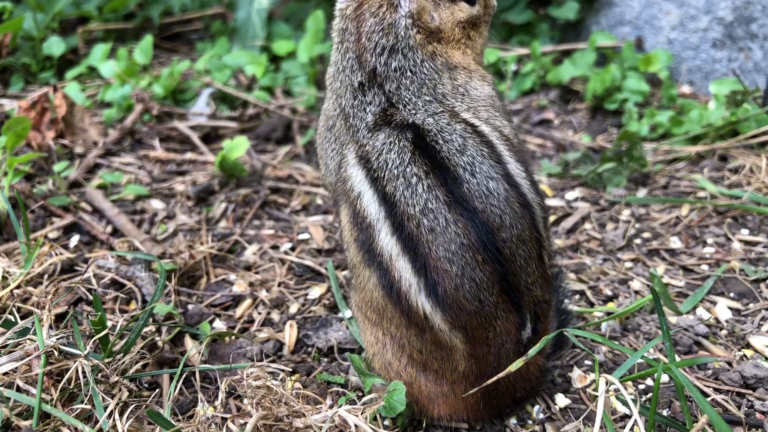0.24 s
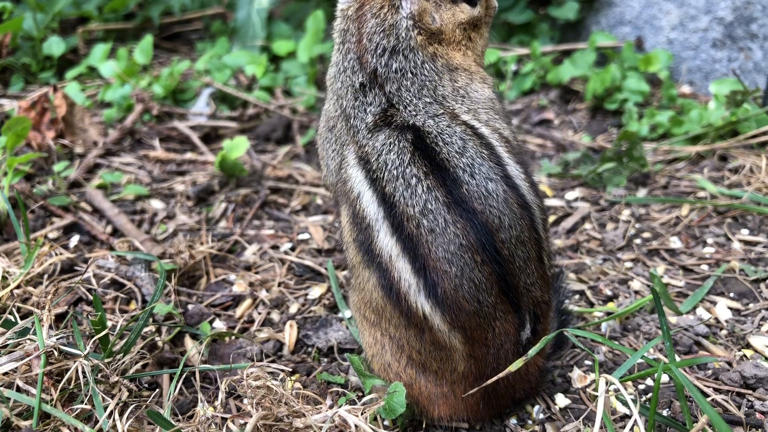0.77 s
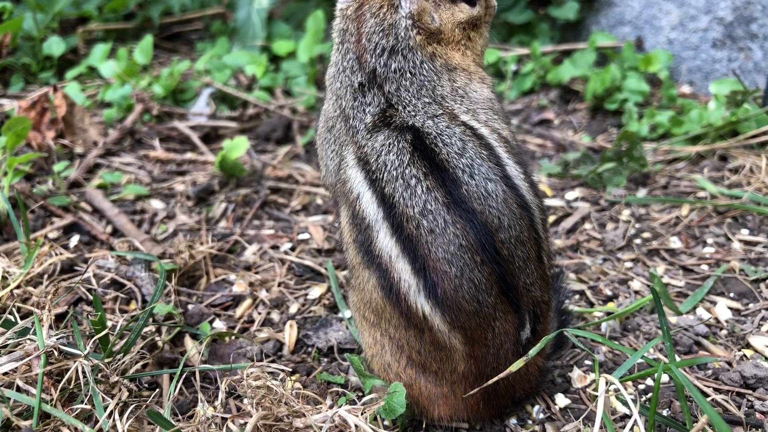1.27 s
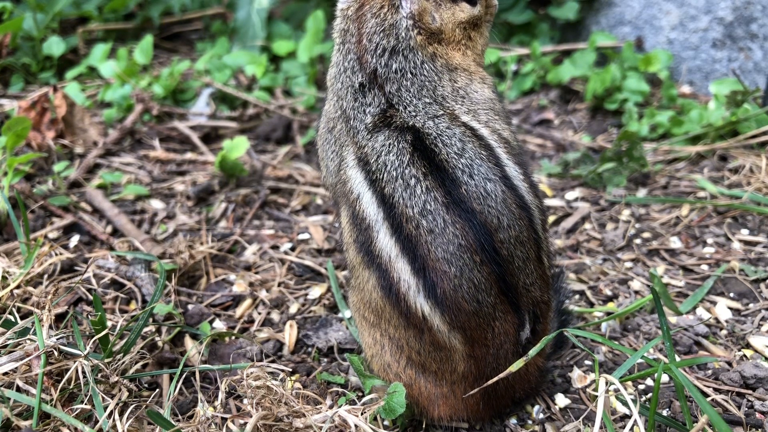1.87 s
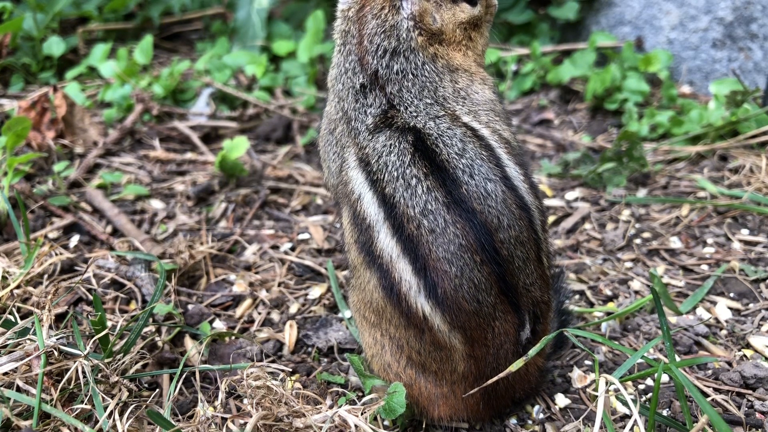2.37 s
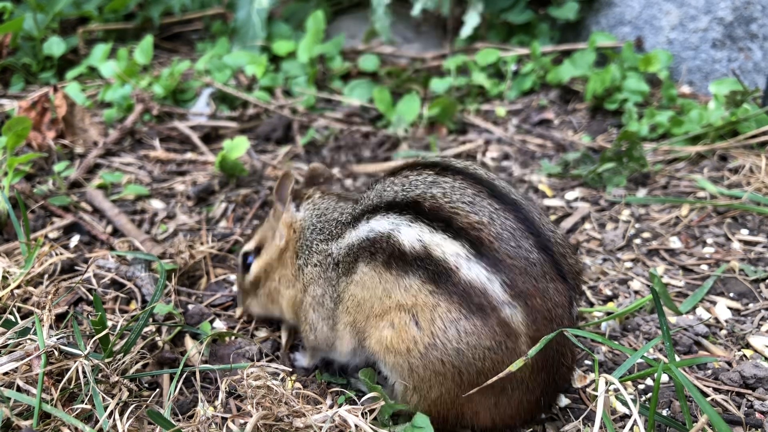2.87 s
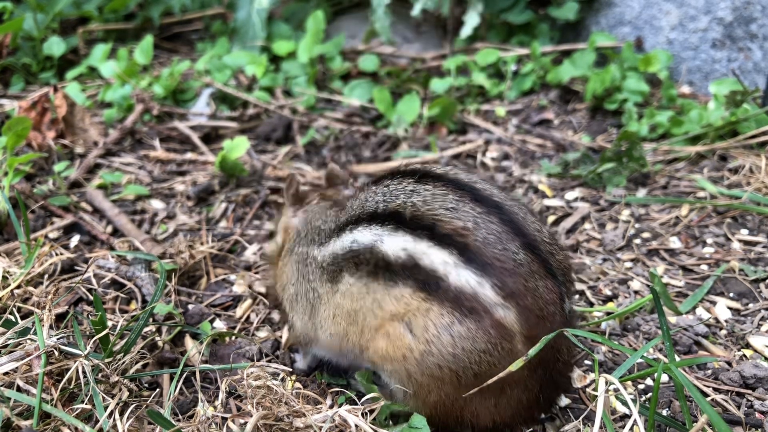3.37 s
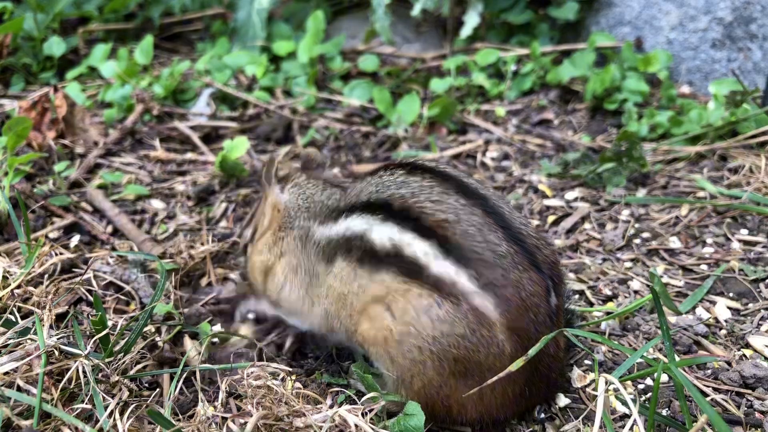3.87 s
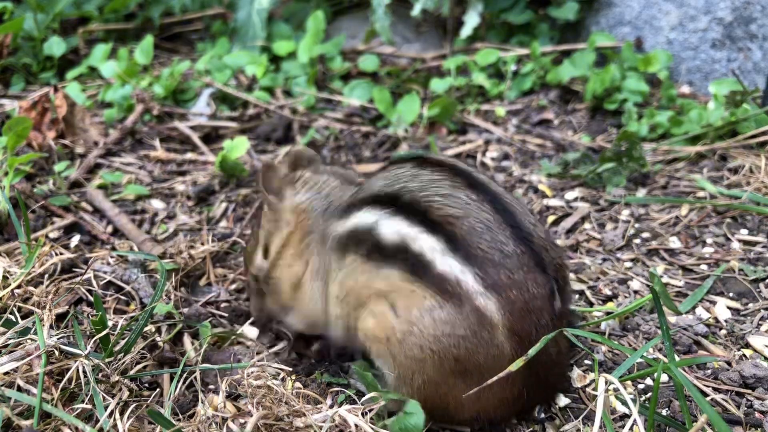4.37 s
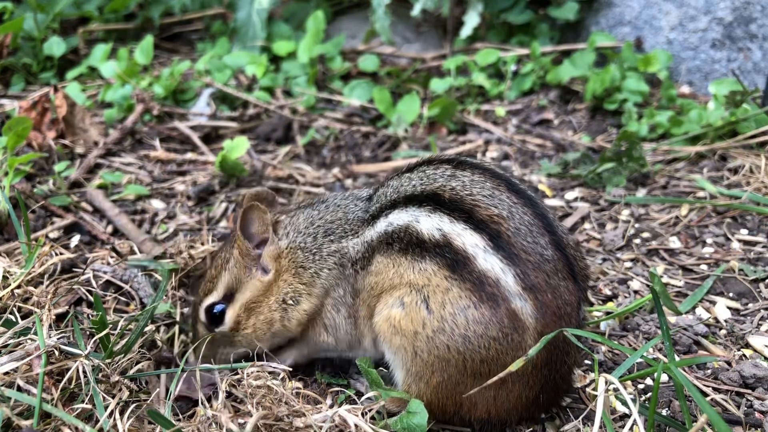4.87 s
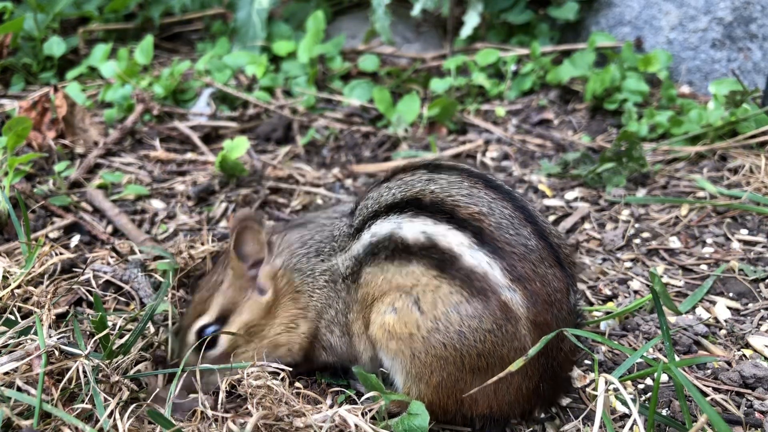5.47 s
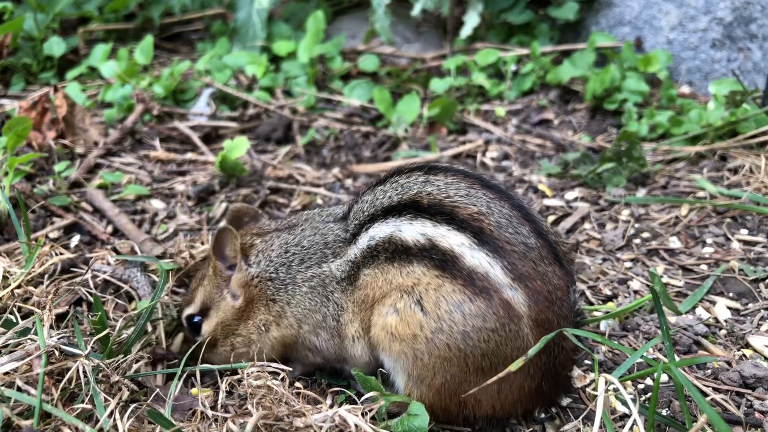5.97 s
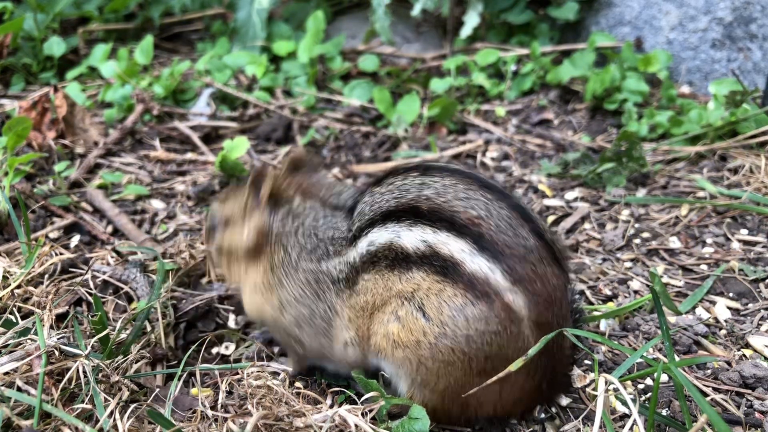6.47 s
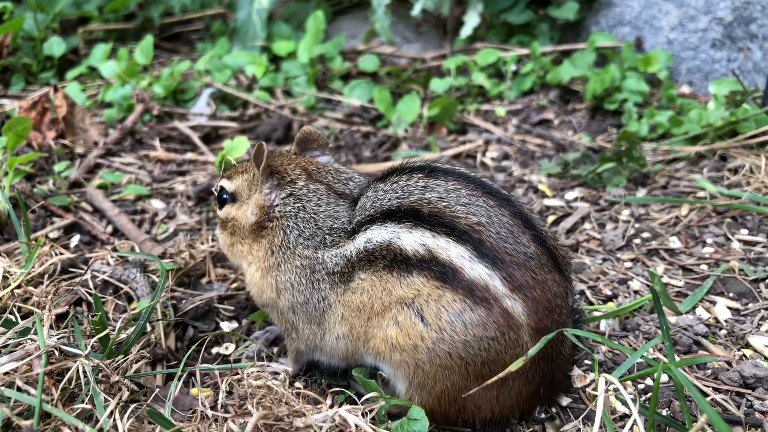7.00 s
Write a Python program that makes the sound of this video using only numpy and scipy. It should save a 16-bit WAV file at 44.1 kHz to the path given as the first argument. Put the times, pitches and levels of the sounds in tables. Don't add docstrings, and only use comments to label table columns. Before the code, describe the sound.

Outdoors in a garden, a chipmunk gives three brief, piercing, rising whistled chips at about 0.6, 2.5 and 5 seconds, each with a rough attack, quick echoes and a short leafy tail. Near the microphone, leaf litter crackles softly and tiny twigs tick, with the strongest snap just before the last chip. Far traffic hum and faint hiss continue beneath; a thin insect rasp pulses later.

```python
import sys
import numpy as np
from scipy import signal
from scipy.fft import rfft, irfft, next_fast_len
from scipy.io import wavfile
from scipy.ndimage import uniform_filter1d, map_coordinates

SR = 44100
rng = np.random.default_rng(int(sys.argv[2]) if len(sys.argv) > 2 else 0)


def natural_amplitude(level_db):
    exponent = np.asarray(level_db, float) / 20
    return 10 ** exponent


def wav_record(signal):
    frames = np.transpose(np.atleast_2d(signal))
    bounded = np.clip(frames, -1, 1)
    quanta = np.round(bounded * 32767).astype(np.int16)
    wavfile.write(sys.argv[1], SR, quanta)


N = 319284


def unit(x):
    return x / np.sqrt(np.mean(x ** 2) + 1e-20)


def along(points, hz):
    f, v = np.transpose(points)
    return np.interp(np.log(hz + 1), np.log(f + 1), v)


def coloured(x, spectrum):
    m = next_fast_len(N + 8192)
    gain = natural_amplitude(along(spectrum, np.fft.rfftfreq(m, 1 / SR)))
    return unit(irfft(rfft(x, m) * gain, m)[:N])


def wobble(rate):
    knots = rng.standard_normal(int(N * rate / SR) + 4)
    return map_coordinates(knots, [np.arange(N) * rate / SR])


def swells(rows):
    t = np.arange(N) / SR
    return sum(gain * np.exp(-.5 * ((t - s) / spread) ** 2) for s, spread, gain in rows)


def air():
    # f/Hz, level/dB
    hum_colour = [(13, -65), (22, -35.5), (32, -24.5), (36, -20), (49, -4.5), (102, -2), (204, -5.5),
                  (262, -9), (292, -7.5), (345, -13), (375, -11.5), (552, -24), (600, -21.5), (780, -54.5),
                  (1320, -120)]
    # f/Hz, level/dB
    hiss_colour = [(260, -31), (450, -1), (553, -3), (595, -5.5), (669, -4), (1390, -11), (1790, -11.5),
                   (2860, -15), (3890, -14.5), (8850, -22), (11000, -26.5), (15000, -26.5)]
    # f/Hz, level/dB
    tyre_colour = [(500, -28.5), (900, 0), (1300, -1), (2000, -3), (2500, -25), (4000, -61)]
    # t/s, level/dB
    road = [(0, 4.5), (1.3, -7), (2.4, -4.5), (3.5, -3.5), (4.1, 2), (6.1, 4), (7.24, 3)]
    hum_db, hiss_db, tyre_db = -63, -71.5, -84.5
    hum_follows, tyres_follow = .05, 1.8
    road_db = np.interp(np.arange(N) / SR, *np.transpose(road))
    hum_level = natural_amplitude(hum_db + hum_follows * road_db + 0.57 * wobble(2.5))
    hum = hum_level * coloured(rng.standard_normal(N), hum_colour)
    hiss = natural_amplitude(hiss_db + .4 * wobble(6)) * coloured(rng.standard_normal(N), hiss_colour)
    tyre_level = natural_amplitude(tyre_db + tyres_follow * road_db + .6 * wobble(2.4))
    tyres = tyre_level * coloured(rng.standard_normal(N), tyre_colour)
    return hum + hiss + tyres


def insect(count=14):
    # f/Hz, level/dB
    wings = [(8000, -48), (8600, -20), (8900, -2), (9300, -18), (9900, -48.5)]
    from_s, every_s, spread_s = 2.775, .342, .04
    start_db, db_per_s, scatter_db = -89.5, -0.1, 2
    since = every_s * np.arange(count)
    gain = natural_amplitude(start_db + db_per_s * since + scatter_db * rng.standard_normal(count))
    rasps = swells([(from_s + s, spread_s, g) for s, g in zip(since, gain)])
    return rasps * coloured(rng.standard_normal(N), wings)


def bird():
    # start t/s, end t/s, first f/Hz, last f/Hz, level/dB
    begin, end, first_hz, last_hz, db = (.453, .51, 7800, 7500, -83)
    u = np.clip((np.arange(N) / SR - begin) / (end - begin), 0, 1)
    pitch = first_hz + (last_hz - first_hz) * u ** 3
    phase = 2 * np.pi * np.cumsum(pitch) / SR
    return natural_amplitude(db + 3 * wobble(91.2)) * np.sqrt(np.abs(np.sin(np.pi * u))) * np.sin(phase)


def stirrings(count=14):
    from_s, faint_db, spread_s = 2.9, -85, .008
    when, size, bright = rng.random((count, 3)).T
    centre = from_s + when * (N / SR - from_s)
    return list(zip(centre, spread_s * (.5 + size), faint_db + 4 * size, .5 + .5 * bright))


def crackle():
    return rng.standard_normal(N) * natural_amplitude(4.5 * wobble(600))


def litter():
    # centre t/s, spread t/s, level/dB, bright share (0-1)
    rustles = [(.9, .018, -74, .85), (1.03, 0.0099, -78, 0.75), (1.152, 0.0073, -76, .8),
               (1.29, .012, -81, .6), (2.65, .03, -73, .15), (3.435, 0.01475, -78, .4),
               (3.6, 0.0114, -80.5, .7), (3.815, .015, -77, .8), (3.85, 0.015, -68.5, .5),
               (3.89, .012, -77, .7), (4.15, 0.0236, -77.5, 0.3), (4.41, 0.0182, -73.5, .63),
               (4.47, 0.0253, -78.5, .7), (4.675, 0.0125, -75.5, 0.98), (4.735, .015, -74, 0.8),
               (4.805, 0.00817, -69.5, 0.78), (4.823, 0.00434, -64, .8), (5.572, 0.0068, -70, .84),
               (5.8, 0.023, -79, .95), (5.885, .018, -77, .6), (6.14, 0.0146, -74.5, .5),
               (7.215, .012, -77, 0.75)]
    # f/Hz, level/dB
    damp_colour = [(600, -23.5), (1500, -1), (3500, -3.5), (7000, -7.5), (12000, -22.5)]
    # f/Hz, level/dB
    dry_colour = [(2500, -32), (6000, -6), (10000, -0.5), (13000, 0), (15000, 5), (16000, 0)]
    bursts = rustles + stirrings()
    dull = swells([(s, w, natural_amplitude(db) * np.sqrt(np.clip(1 - b, 0, 1))) for s, w, db, b in bursts])
    bright = swells([(s, w, natural_amplitude(db) * np.sqrt(np.clip(b, 0, 1))) for s, w, db, b in bursts])
    return dull * coloured(crackle(), damp_colour) + bright * coloured(crackle(), dry_colour)


def twigs():
    # t/s, peak level/dB, f/Hz
    ticks = [(2.636, -66, 11000), (2.655, -63, 9000), (2.685, -62.5, 12000), (3.43, -61, 3300),
             (3.9255, -52, 6970), (4.4927, -63, 12000), (4.929, -42.5, 3300), (4.936, -41, 3400),
             (4.9797, -49.5, 3920), (5.0185, -55, 3500), (5.308, -55, 3800), (5.431, -60.5, 4000),
             (6.875, -69, 13040)]
    snap_cycles = 1.9
    rebound_s, rebound_db = .0014, -14
    splinter_hz, splinter_db, splinter_cycles = 15000, -17, 2.5
    parts = []
    for s, db, hz in ticks:
        parts.append((s, db, hz, snap_cycles))
        parts.append((s + rebound_s, db + rebound_db, hz, snap_cycles))
        parts.append((s, db + splinter_db, splinter_hz, splinter_cycles))
    out, t = np.zeros(N), np.arange(-40, 200) / SR
    for s, db, hz, cycles in parts:
        shape = np.exp(-np.where(t < 0, -2.5 * t, 1.43 * t) * hz / cycles * 2)
        out[round(s * SR) - 40:][:len(t)] += natural_amplitude(db) * shape * np.cos(2 * np.pi * hz * t)
    return out


def scatter(t60s, build):
    hz, t, z = signal.stft(rng.standard_normal(SR // 2), SR, nperseg=128)
    fall = natural_amplitude(-60 * t / along(t60s, hz)[:, None])
    tail = signal.istft(z * fall, SR, nperseg=128)[1][:SR // 2]
    tail = tail * (1 - np.exp(-np.arange(SR // 2) / (build * SR)))
    return tail / np.linalg.norm(tail)


def chip(start_hz, top_hz, glide, length, octave_db, fade_db, squeak_db, foot_db, mouth):
    open_s = .0022
    sag_db, sag_s = -6.5, .012
    dip_share = .25
    since = np.arange(SR // 10) / SR
    t = np.clip(since - .0015, 0, None)
    pitch = top_hz - (top_hz - start_hz) * np.exp(-t / glide)
    pitch = pitch * (1 + 0.0071 * wobble(297)[:len(t)])
    pitch = pitch - (start_hz - 4950) * np.exp(-t / .0011)
    phase = 2 * np.pi * np.cumsum(pitch) / SR

    rise = 1 - np.exp(-(t / .0012) ** 2)
    swell = rise * natural_amplitude(fade_db * (t / length) ** 2 + 1.5 * wobble(600)[:len(t)])
    shut_db = foot_db / (1 + np.exp((t - open_s) / .0005))
    swell = swell * natural_amplitude(shut_db + sag_db * (1 - np.exp(-(t / sag_s) ** 2)))
    swell = swell / (1 + np.exp((t - length) / .001))

    mouth_db = along(mouth, 2 * pitch)
    whistle = natural_amplitude(dip_share * mouth_db) * np.sin(phase)
    octave = natural_amplitude(octave_db + 0.54 * shut_db + mouth_db - 151.5 * t) * np.sin(2 * phase)
    third = natural_amplitude(-36) * (pitch < 5600) * np.sin(3 * phase)

    side_tones = np.sin(2 * np.pi * 8000 * since + 0.23 * phase) * np.cos(0.2 * phase)
    puff = .6 * np.diff(rng.standard_normal(len(t) + 2), 2)
    squeak = natural_amplitude(squeak_db) * np.exp(-((since - .0032) / .0017) ** 2) * (side_tones + puff)
    return swell * (whistle + octave + third) + squeak


def chipmunk():
    # t/s, start f/Hz, top f/Hz, length t/s, level/dB
    chips = [
        (-.19, 5000, 7270, .021, -30),
        (.6094, 5110, 7480, .022, -21.5),
        (2.4654, 5100, 7150, .047, -22.5),
        (5.0160, 5700, 7680, .02, -21.3),
    ]
    # delay t/ms, level/dB
    near = [(1.3, -7.5), (2.9, -1.5), (6.3, -11), (11.8, -10.5), (16, -10.5), (27, -15)]
    # f/Hz, t/s
    thicket = [(5000, 0.12975), (7000, 0.12), (13000, 0.11)]
    # f/Hz, t/s
    garden = [(5000, .37), (6000, .4), (7000, .4), (11000, .26), (14500, 0.19)]
    # f/Hz, level/dB
    mouth_colour = [(10200, -9), (11000, 6), (12100, 0), (12750, -15.5), (13450, 3.5), (14500, 1)]
    slack_hz = 5000
    close_db, far_db, far_db_per_s = -10, -10.5, -115
    shift, shift_db = .1, -2
    out = np.zeros(N + 2 * SR)
    for s, start_hz, top_hz, length, db in chips:
        wide = (start_hz - slack_hz) / 1000
        glide = .0061 + .0046 * (top_hz - 7300) / 1000 + .0045 * wide
        flatten = np.clip(1 - 1.1 * wide, 0, 1)
        mouth = [(hz, level * flatten) for hz, level in mouth_colour]
        voice = chip(start_hz, top_hz, glide, length, octave_db=-13.5 + 7 * wide, fade_db=-14.5 + 10 * wide,
                     squeak_db=-30 + 1 * wide, foot_db=-4 - 9 * wide, mouth=mouth)

        path = natural_amplitude(close_db) * scatter(thicket, build=.004)
        path = path + natural_amplitude(far_db + far_db_per_s * length) * scatter(garden, build=0.03)
        path[0] += 1
        for (ms, echo_db), (late, loud) in zip(near, rng.standard_normal((len(near), 2))):
            delay = round(ms * np.exp(shift * late) * SR / 1000)
            path[delay:][:2] += natural_amplitude(echo_db + shift_db * loud) * 0.56
        heard = signal.fftconvolve(voice, path)
        out[SR + round(s * SR):][:len(heard)] += natural_amplitude(db) * heard
    return out[SR:SR + N]


def scene():
    return (chipmunk() + litter() + twigs() + insect() + bird() + air())[None]


def unmasked(x, below_db, slope_db, quiet_db, size=8):
    smear_db, top_hz = -31, 15720
    hz, _, z = signal.stft(x, SR, nperseg=1024, noverlap=512)
    bands = z[:-1].reshape(-1, size, z.shape[1])
    level = 10 * np.log10(np.mean(np.abs(bands) ** 2, axis=1) + 1e-20)
    steady = uniform_filter1d(level, size=3, axis=1)
    ramp = slope_db * np.arange(len(level))[:, None]
    mask = np.maximum.accumulate(steady + ramp, axis=0) - ramp - below_db
    centre = hz[size // 2:-1:size, None]
    keep = (level > mask) | (centre < 7500)
    keep &= (uniform_filter1d(steady, size=2, axis=0) > quiet_db) | (centre < 15200)
    random_turn = np.exp(2j * np.pi * rng.random(z[:-1].shape))
    z[:-1] += np.repeat(natural_amplitude(level + smear_db), size, axis=0) * random_turn
    z[:-1] *= np.repeat(keep, size, axis=0) * (hz[:-1, None] < top_hz)
    return signal.istft(z, SR, nperseg=1024, noverlap=512)[1][:N]


def roll_off(x):
    return signal.sosfilt(signal.butter(12, 15710, fs=SR, output="sos"), x)


def record(dry):
    kept = unmasked(dry[0], below_db=19.5, slope_db=2.5, quiet_db=-110)
    return roll_off(kept[None])


dry = scene()
out = record(dry)
wav_record(out)
```